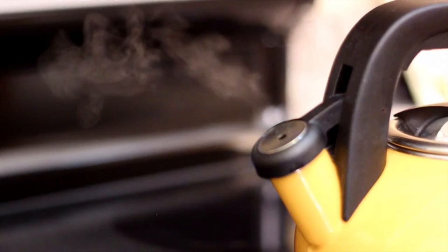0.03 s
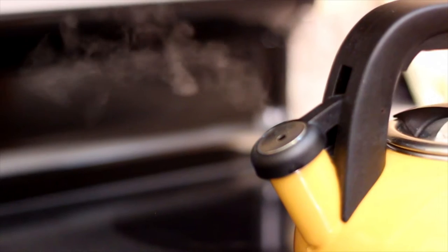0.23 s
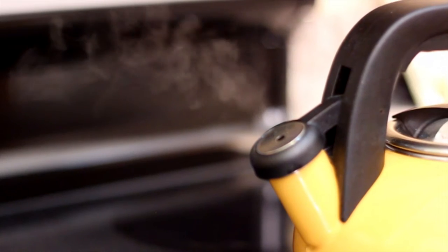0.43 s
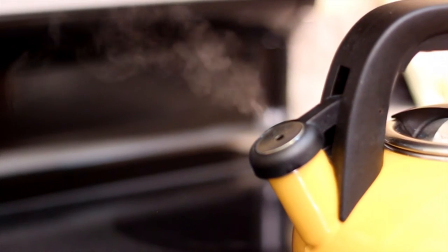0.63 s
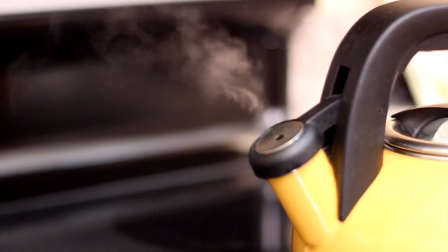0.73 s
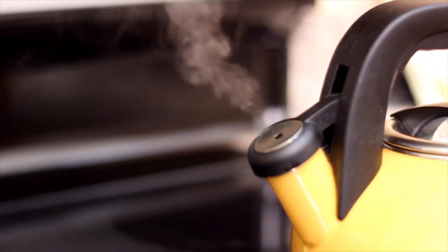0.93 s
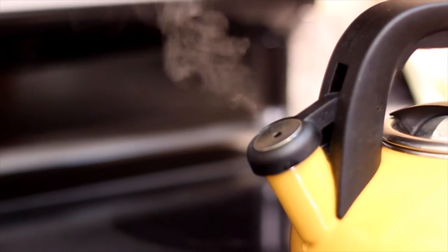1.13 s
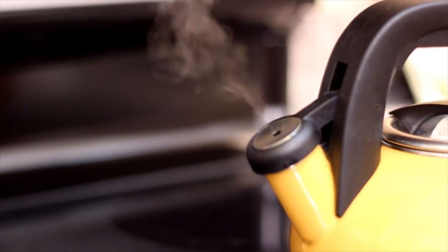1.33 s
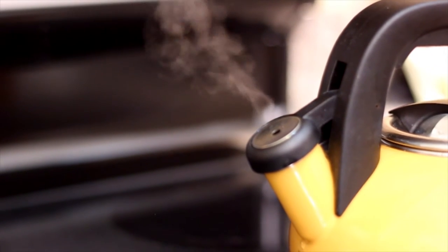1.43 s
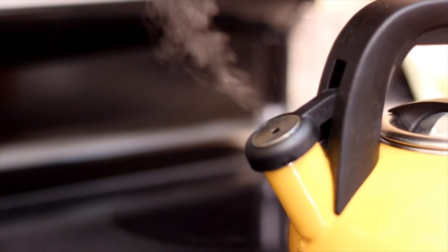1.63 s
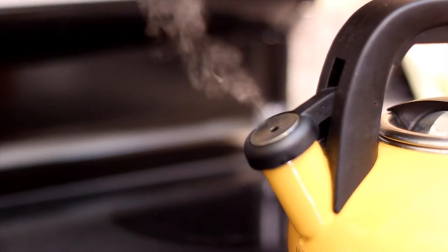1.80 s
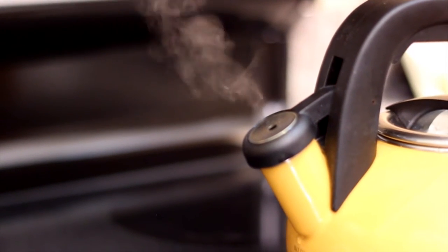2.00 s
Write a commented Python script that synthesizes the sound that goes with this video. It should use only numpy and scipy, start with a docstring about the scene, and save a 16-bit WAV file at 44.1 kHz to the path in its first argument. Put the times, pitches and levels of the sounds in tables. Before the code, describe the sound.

Close kettle whistle at a rolling boil: a nearly pure, fast-wobbling high tone climbs gradually over soft steam hiss and faint bubbling rumble, then drops suddenly to a rough lower note, with slight room reflections.

```python
"""A kettle whistles at a rolling boil, close to the microphone in a quiet kitchen.
The sound sets in abruptly. Bursting bubbles push the steam in surges: the nearly pure high note wobbles
and creeps up, its loudness read from its pitch. Near the end the jet breaks over to a lower, reedier note
built from overtones and fuzzy half tones, with harsh spits of noise.
Shaped noise makes the steam hiss and the faint boiling rumble underneath; a short tail is the room."""
import sys
import numpy as np
from scipy import signal
from scipy.io import wavfile
from scipy.ndimage import uniform_filter1d

SR = 44100
rng = np.random.default_rng(int(sys.argv[2]) if len(sys.argv) > 2 else 0)


def generate_wav(signal):
    """Clip the signal to [-1, 1] and save it as 16-bit WAV at the path in sys.argv[1]."""
    frames = np.transpose(np.atleast_2d(signal))
    scaled = np.clip(frames, -1, 1) * 32767
    pcm = np.round(scaled).astype(np.int16)
    wavfile.write(sys.argv[1], SR, pcm)


N = 91022
TIME_S = np.arange(N) / SR

# Pitch of the high note, set by the steam speed: (time [s], pitch [Hz])
HIGH_PITCH = [(0.122, 2091), (0.151, 1980), (0.163, 2059), (0.177, 1973), (0.184, 2033), (0.189, 1998),
              (0.199, 2074), (0.209, 2032), (0.216, 2022), (0.226, 2225), (0.236, 2242), (0.264, 2089),
              (0.281, 2126), (0.293, 2231), (0.31, 2206), (0.326, 2080), (0.333, 2109), (0.364, 2107),
              (0.371, 2127), (0.384, 2084), (0.39, 2249), (0.397, 2283), (0.411, 2152), (0.423, 2235),
              (0.434, 2218), (0.44, 2152), (0.462, 2107), (0.475, 2251), (0.48, 2301), (0.49, 2164),
              (0.515, 2301), (0.537, 2154), (0.543, 2149), (0.563, 2033), (0.578, 2198), (0.603, 2170),
              (0.615, 2291), (0.629, 2149), (0.639, 2195), (0.656, 2126), (0.671, 2111), (0.708, 2150),
              (0.718, 2101), (0.724, 2120), (0.743, 2079), (0.76, 2120), (0.775, 2277), (0.798, 2165),
              (0.809, 2226), (0.832, 2148), (0.839, 2189), (0.872, 2170), (0.878, 2201), (0.885, 2435),
              (0.894, 2575), (0.903, 2218), (0.908, 2265), (0.92, 2210), (0.93, 2332), (0.949, 2163),
              (0.957, 2246), (0.965, 2196), (0.978, 2386), (0.991, 2224), (1.007, 2224), (1.013, 2180),
              (1.032, 2283), (1.048, 2233), (1.064, 2261), (1.075, 2283), (1.087, 2182), (1.132, 2250),
              (1.144, 2316), (1.168, 2249), (1.191, 2310), (1.219, 2295), (1.24, 2241), (1.261, 2309),
              (1.288, 2235), (1.297, 2313), (1.309, 2344), (1.317, 2393), (1.331, 2294), (1.338, 2380),
              (1.349, 2321), (1.362, 2332), (1.375, 2538), (1.386, 2306), (1.397, 2275), (1.424, 2378),
              (1.462, 2207), (1.478, 2334), (1.488, 2424), (1.506, 2455), (1.515, 2324), (1.531, 2300),
              (1.546, 2440), (1.554, 2391), (1.563, 2533), (1.573, 2344), (1.581, 2448), (1.594, 2365),
              (1.617, 2287), (1.629, 2274), (1.653, 2505), (1.661, 2464), (1.67, 2296), (1.682, 2504),
              (1.695, 2457), (1.704, 2298), (1.719, 2418), (1.733, 2402), (1.741, 2286), (1.753, 2312),
              (1.775, 2395), (1.785, 2561), (1.797, 2420), (1.81, 2433), (1.823, 2343), (1.837, 2404),
              (1.848, 2567), (1.858, 2587), (1.869, 2644), (1.88, 2484), (1.885, 2620)]
# The low note: (time [s], pitch [Hz], level [dB], octave level [dB], half-tone level [dB])
LOW_NOTE = [(1.865, 1583, -50, -77, -34), (1.883, 1565, -37, -47, -25), (1.893, 1619, -29.5, -32.5, -29),
            (1.907, 1714, -32, -35.5, -30), (1.918, 1642, -33.5, -38, -34), (1.925, 1654, -32, -34, -29),
            (1.935, 1598, -33.5, -34, -31), (1.942, 1626, -28, -37.5, -33),
            (1.952, 1598, -30.5, -31.5, -31), (1.962, 1738, -31.5, -37, -52), (1.97, 1750, -31, -32.5, -43),
            (1.982, 1610, -32.5, -35, -32), (2.004, 1576, -30, -33, -28), (2.015, 1640, -32, -36, -34.5),
            (2.03, 1585, -31, -35, -31.5), (2.043, 1598, -31, -34, -37), (2.06, 1660, -32.5, -34, -33)]

GLIDE_S = 0.0035  # smoothing of the time tables
JITTER_HZ, JITTER_S = 10, 0.0045  # random pitch wobble: RMS depth, averaging time
FLUTTER_S = 0.0061  # averaging time of the high note's level flutter and of the overtone phase blur


def amp(db):
    """Turns decibels into an amplitude factor."""
    return 10 ** (np.asarray(db) / 20)


def evened(x):
    """Scales to an RMS of one."""
    return x / np.sqrt(np.mean(x ** 2) + 1e-20)


def smooth(x, s):
    """Averages twice, each time over half of s seconds."""
    size = max(round(s * SR / 2), 1)
    return uniform_filter1d(uniform_filter1d(x, size), size)


def curve(table):
    """Gives the columns of a time table at every sample, with glides between the rows."""
    s, *columns = np.transpose(table)
    return [smooth(np.interp(TIME_S, s, column), GLIDE_S) for column in columns]


def wobble(s):
    """Slow random drift of RMS one, from noise averaged over s seconds."""
    return evened(smooth(rng.standard_normal(N), s))


def read(points, hz):
    """Reads a table over frequency, in straight lines on a logarithmic axis."""
    f, value = np.transpose(points)
    return np.interp(np.log(hz + 1), np.log(f + 1), value)


def bumps(table, flat=2):
    """Swells (centre [s], length [s], level [dB]); a higher flat gives a flatter top."""
    return sum(amp(db) * np.exp(-abs((TIME_S - s) / length) ** flat) for s, length, db in table)


def fuzzy(hz, width, steady=0):
    """A tone whose strength and phase drift at random over about a width in Hz, around a steady part."""
    drift = steady + wobble(1 / width) + 1j * wobble(1 / width)
    drift = drift / np.sqrt(1 + steady ** 2 / 2)
    carrier = np.exp(2j * np.pi * np.cumsum(hz * np.ones(N)) / SR)
    return (drift * carrier).real


def tones(hz, table, loose):
    """Locked overtones (multiple, RMS level [dB]); loose scales the flutter and blur of the upper ones."""
    octave_flutter_db, overtone_flutter_db = 2, 4  # RMS, before loose
    blur_rad = 0.27  # RMS phase blur per overtone above the octave, before loose
    turns, out = np.cumsum(hz) / SR, np.zeros(N)
    for k, db in table:
        depth_db = (k == 2) * octave_flutter_db + (k > 2) * overtone_flutter_db
        flutter_db = loose * depth_db * wobble(0.0062)
        blur = loose * blur_rad * max(k - 2, 0) * wobble(FLUTTER_S)
        out -= amp(db + flutter_db) * np.sqrt(2) * np.cos(2 * np.pi * k * turns + blur)
    return out


def noise(spectrum, patchy_db):
    """Two channels of patchy noise from random short-time spectra."""
    # Left-right likeness at the microphone: (frequency [Hz], likeness [0-1])
    likeness = [(30, 0.65), (70, 0.93), (200, 0.92), (600, 0.98), (2000, 1)]
    hz = np.fft.rfftfreq(1024, 1 / SR)
    a, b, c, d, patches = rng.standard_normal((N // 256 + 5, 513, 5)).T
    patches = evened(uniform_filter1d(uniform_filter1d(patches, 10, 0), 8, 1))
    same = np.clip(read(likeness, hz), -1, 1)[:, None]
    left = a + 1j * b
    right = same * left + np.sqrt(1 - same ** 2) * (c + 1j * d)
    shaped = np.array([left, right]) * amp(read(spectrum, hz)[:, None] + patchy_db * patches)
    return evened(signal.istft(shaped, nperseg=1024, noverlap=768)[1][:, :N])


def broken():
    """Goes from 0 to 1 as the jet breaks over to the low note."""
    break_s, fade_s = 1.885, 0.0046
    return .5 + .5 * np.tanh((TIME_S - break_s) / fade_s)


def high_note():
    """Nearly a sine; steam speed sets its pitch, and level and overtones are read from that pitch."""
    # The whistle speaks loudest near the resonance of its cap: (pitch [Hz], level [dB])
    cap_resonance = [(1980, -41), (2100, -33), (2200, -29.5), (2280, -25.5), (2350, -25.5), (2430, -23),
                     (2500, -26.5), (2580, -30)]
    # Overtones: (multiple, level at the middle pitch [dB], slope over pitch [dB/Hz])
    overtones = [(2, -49.5, 0.028), (3, -69.5, 0.038), (4, -75, 0.0109), (5, -79.5, 0.0247),
                 (6, -85, 0.0176), (7, -89.5, 0.0229)]
    # Fuzzy in-between tones when alternate puffs differ: (multiple, level against the note [dB])
    between_tones = [(.46, -23.5), (0.541, -18), (1.53, -14.5)]
    # Moments of alternating puffs: (centre [s], length [s], level [dB])
    splits = [(.198, 0.023, -4.5), (.738, 0.022, -13)]
    middle_hz, top_hz = 2391, 2440  # above the top the overtones grow no more
    flutter_db, split_width_hz = 0.69, 130

    hz = curve(HIGH_PITCH)[0] + JITTER_HZ * wobble(JITTER_S)
    glided_hz = smooth(hz, GLIDE_S)
    level_db = read(cap_resonance, glided_hz) + flutter_db * wobble(FLUTTER_S)
    halves = sum(amp(level_db + db) * fuzzy(k * hz, split_width_hz) for k, db in between_tones)
    above_hz = np.minimum(glided_hz, top_hz) - middle_hz
    table = [(1, level_db)] + [(k, db + slope * above_hz) for k, db, slope in overtones]
    return (tones(hz, table, 0.98) + bumps(splits, flat=4.6) * halves) * (1 - broken())


def low_note():
    """The reedier note after the break: a strong octave, and fuzzy half tones that come and go."""
    # Overtones: (multiple, level over the octave [dB])
    overtones = [(3, -15.5), (4, -27.5), (5, -30), (6, -36), (7, -47), (8, -53), (9, -53)]
    # Tones halfway between the overtones: (multiple, level over the half-tone curve [dB])
    half_tones = [(.5, -38), (1.5, -14.5), (2.5, -23.5), (3.5, -34), (4.5, -37.5), (5.5, -43)]
    half_width_hz, half_steady = 100, 1.2

    hz, level_db, octave_db, half_db = curve(LOW_NOTE)
    grow = np.clip((TIME_S - LOW_NOTE[0][0]) / 0.004 + 1, 0, 1)  # 4 ms up to the first row
    hz = hz + JITTER_HZ * wobble(JITTER_S)
    halves = sum(amp(half_db + db) * fuzzy(k * hz, half_width_hz, half_steady) for k, db in half_tones)
    table = [(1, level_db), (2, octave_db)] + [(k, octave_db + db) for k, db in overtones]
    return grow * (tones(hz, table, 0.55) + halves * broken())  # firmer than the high note


def mixing():
    """Both notes share one jet for a moment and breed sum and difference tones."""
    # (times high pitch, times low pitch, level against the low note [dB])
    mixed_tones = [(1.2, 0.97, -10), (2.09, -0.96, -8.5), (0.66, -0.66, -17.5)]
    high_hz = curve(HIGH_PITCH)[0]
    low_hz, low_db, *_ = curve(LOW_NOTE)
    both = amp(low_db) * (1 - broken()) * (TIME_S > LOW_NOTE[0][0])
    return both * sum(amp(db) * fuzzy(m * high_hz + n * low_hz, 56) for m, n, db in mixed_tones)


def spits():
    """Harsh spits of steam as the jet reorganises, a steady rasp under the low note, and a bright crack."""
    # Spits: (centre [s], length [s], level [dB])
    spit_times = [(1.868, .015, -56), (1.889, 0.0103, -47.5), (1.925, 0.016, -51.5), (1.975, 0.0068, -45)]
    # Colour of spits and rasp: (frequency [Hz], relative level per Hz [dB])
    spit_colour = [(500, -32), (2500, 5), (4000, 0.5), (6000, -10.5), (8000, -10), (12000, -22.5),
                   (13500, -29), (15500, -29)]
    # Colour of the crack: (frequency [Hz], relative level per Hz [dB])
    crack_colour = [(1500, -20), (4000, -2), (9000, -2), (12000, -10), (15500, -24)]
    rasp_db = -53
    harsh = (bumps(spit_times) + amp(rasp_db) * broken()) * noise(spit_colour, patchy_db=3.5)
    # the crack comes as the low note locks in: centre [s], length [s], level [dB]
    crack = bumps([(1.8915, 0.0018, -53)]) * noise(crack_colour, patchy_db=2.0)
    return harsh + crack


def surge():
    """Strength of each steam surge, 0 to 1, from how fast the high pitch rises."""
    full_hz_per_s = 22000
    rise_hz_per_s = smooth(np.gradient(curve(HIGH_PITCH)[0]) * SR, .006)
    return np.clip(rise_hz_per_s / full_hz_per_s, 0, 1)


def hiss():
    """Broad jet noise that puffs at each surge and eases a little while the pitch is high."""
    # Colour of the steam: (frequency [Hz], relative level per Hz [dB])
    hiss_colour = [(1200, -29), (2200, -4), (3300, 4.5), (5000, 0), (7000, -6), (10000, -8), (12500, -14.5),
                   (14000, -20), (15500, -21.5)]
    level_db, db_per_hz, surge_db = -64, -0.0064, 6.5  # level at the mean pitch, without a surge
    hz = curve(HIGH_PITCH)[0]
    level = amp(level_db + db_per_hz * (hz - hz.mean()))
    return amp(surge_db * surge()) * level * noise(hiss_colour, patchy_db=1.5)


def boil():
    """Faint low noise of the boiling water, swelling with each surge."""
    # Colour of the boil: (frequency [Hz], relative level per Hz [dB])
    boil_colour = [(15, -45), (30, -19.5), (60, -12.5), (100, -2.5), (165, 4), (230, -1.5), (400, -3.5),
                   (550, -4), (700, 0.5), (1000, 2), (1300, -4.5), (1700, -2.5)]
    level_db, surge_db = -62.5, 7  # level without a surge
    rumble = noise(boil_colour + [(3500, -46.5)], patchy_db=2.0)
    return amp(surge_db * surge()) * amp(level_db) * rumble


def hum():
    """Wavering low tones, each partly steady and partly drifting."""
    # (frequency [Hz], width [Hz], level [dB])
    low_tones = [(68, 6, -77.5), (303, 12, -72), (985, 14, -76)]
    return sum(amp(db) * fuzzy(hz, width, steady=1.0) for hz, width, db in low_tones)


def kitchen(x):
    """Room reflections as a short decaying noise tail, slightly different left and right."""
    tail_db, side_db, t60_s, delay_s = -19, -14.5, 0.24, 0.0065
    t = np.arange(SR // 2) / SR
    mid, side = rng.standard_normal((2, len(t))) * amp(-60 * t / t60_s) * (t > delay_s)
    tail = np.array([mid + amp(side_db) * side, mid - amp(side_db) * side])
    return amp(tail_db) * signal.fftconvolve(x[None], tail / np.linalg.norm(mid), axes=1)[:, :N]


def scene():
    """The whistle close by and in the room, over steam, boil and hum."""
    whistle = high_note() + low_note() + mixing()
    return whistle + kitchen(whistle) + spits() + hiss() + boil() + hum()


def record(dry):
    """Opens abruptly, then limits the band from above."""
    start_s, opening_s, edge_hz = 0.11655, 0.00017, 15720
    opened = dry * np.clip((TIME_S - start_s) / opening_s, 0, 1)
    lowpass = signal.firwin(511, edge_hz, window=("kaiser", 9), fs=SR)
    return signal.oaconvolve(opened, lowpass[None], "same")


dry = scene()
out = record(dry)
generate_wav(out)
```